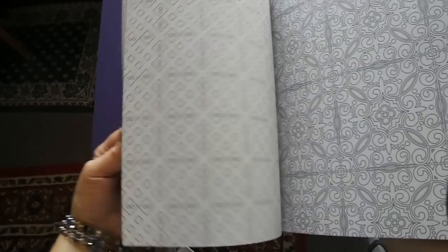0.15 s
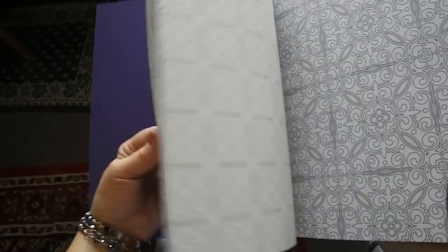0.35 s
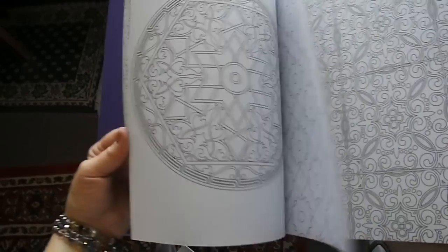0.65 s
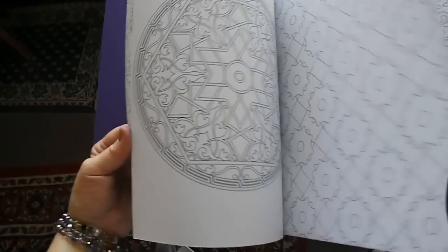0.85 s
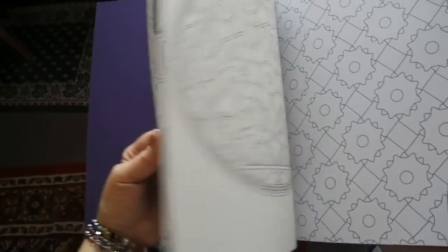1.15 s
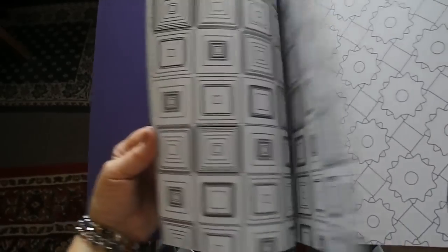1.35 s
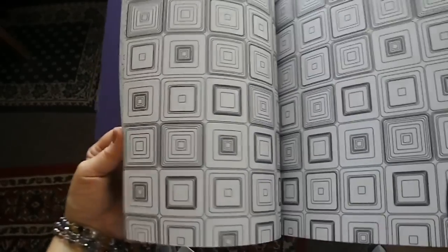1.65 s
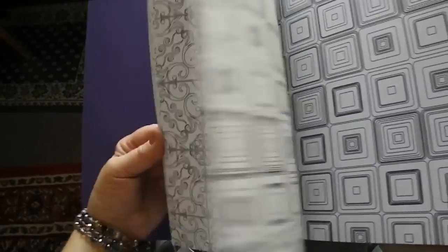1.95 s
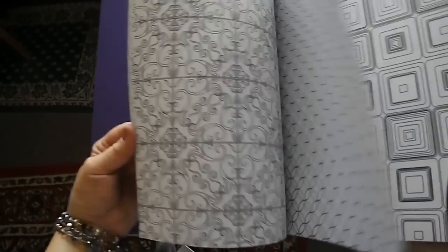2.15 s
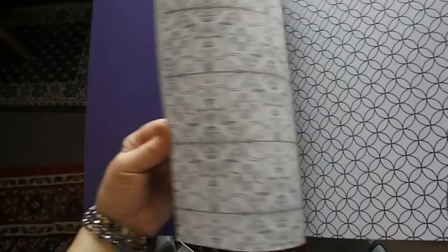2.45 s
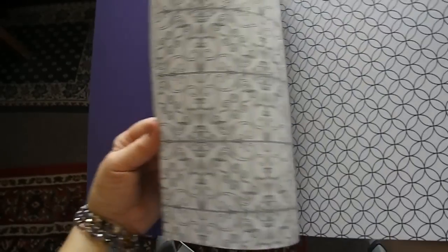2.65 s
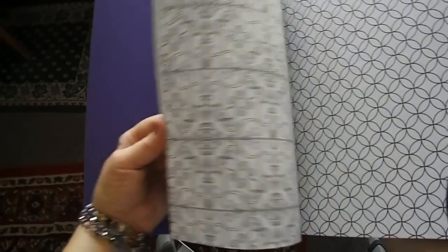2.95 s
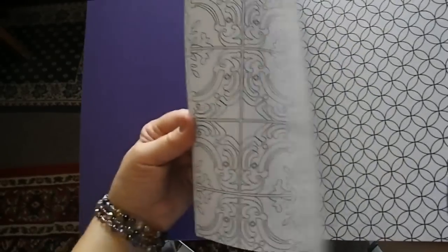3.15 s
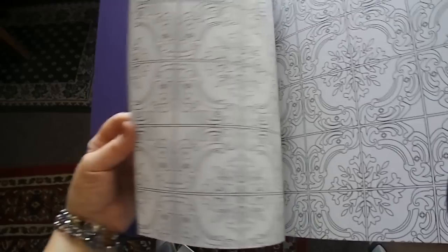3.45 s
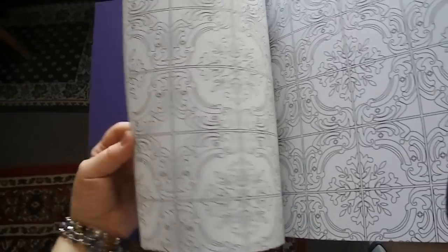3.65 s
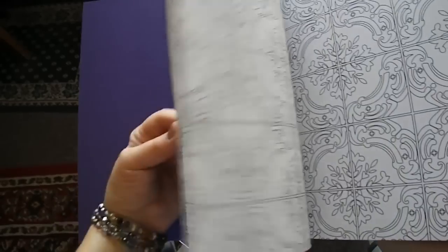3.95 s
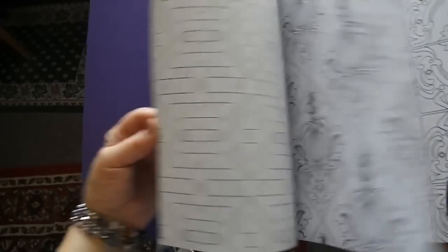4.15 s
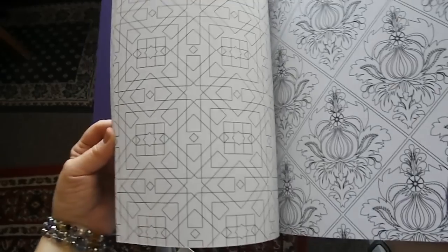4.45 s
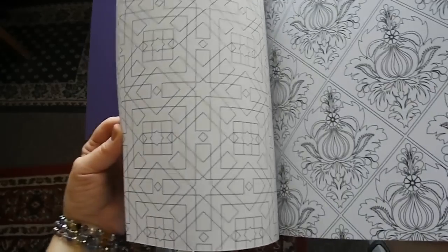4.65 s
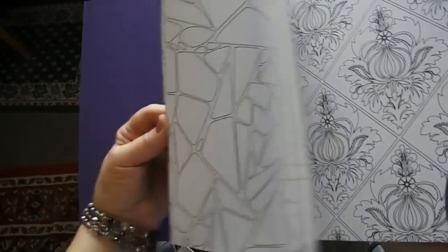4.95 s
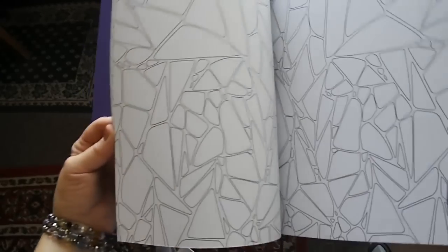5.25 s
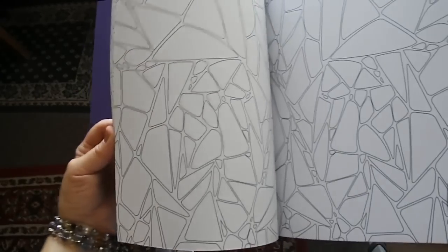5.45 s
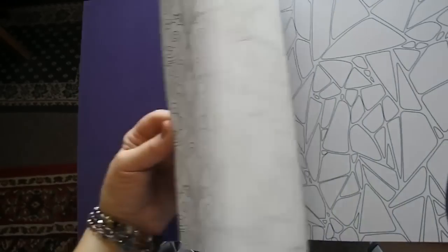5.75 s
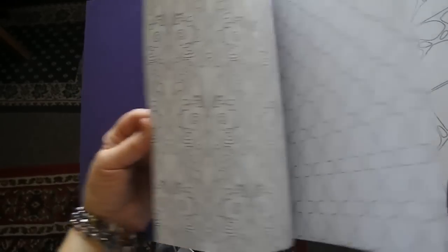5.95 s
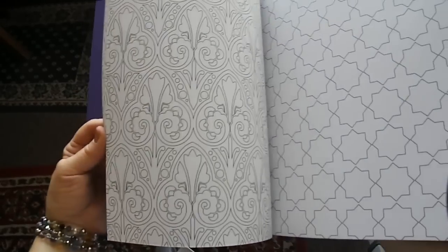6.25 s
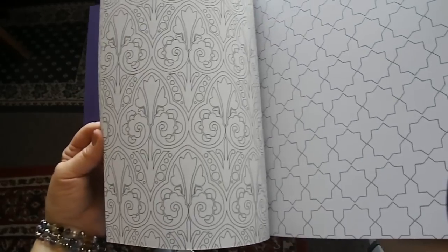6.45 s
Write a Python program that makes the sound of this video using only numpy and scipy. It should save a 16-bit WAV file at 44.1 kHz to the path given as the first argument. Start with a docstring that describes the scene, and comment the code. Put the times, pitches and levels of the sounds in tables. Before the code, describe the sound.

Thick pages of a large book slip off a thumb one after another, very close to a small camera. Each turn is a quick cluster of hollow papery snaps with bright edge ticks and a short rustle. Some flaps are loud and sharp, others only a soft slide or sweep. Between them lie restless paper movement, constant hiss, thin high whines and a faint buzz. The small room is dry.

```python
"""Stiff book pages flapping off a thumb

Stiff pages of a large book slip off a thumb one by one and flap over, close to a small camera in a quiet room.
Each flap is a cluster of buckling snaps: ringing page modes, delayed so that the highs arrive first.
Noise bursts make bright edge ticks, grains and noise a short rustle, slow band noise the sweeps and draughts.
The camera adds shaped hiss, steady whines, a buzz pulse at every frame and a comb of high tones once a second."""
import sys
import numpy as np
from scipy import signal
from scipy.fft import rfft, irfft, next_fast_len
from scipy.io import wavfile

SR = 44100
rng = np.random.default_rng(int(sys.argv[2]) if len(sys.argv) > 2 else 0)


def decibels_to_gain(level_db):
    """Convert a level in decibels to a linear amplitude gain (20 dB per decade)."""
    exponent = np.asarray(level_db, float) / 20
    return 10 ** exponent


def unload_audio(sound):
    """Save the sound as a 16-bit wav file, at the path given as the first command line argument."""
    columns = np.transpose(np.atleast_2d(sound))
    # keep every value between -1 and 1, then stretch to whole-number steps
    steps = np.round(np.clip(columns, -1, 1) * 32767)
    wavfile.write(sys.argv[1], SR, steps.astype(np.int16))


N = 290619

# hiss spectrum, relative: [freq_hz, level_db_per_hz]
HISS_SPECTRUM = [(15, -43), (30, -11), (99, -12.5), (307, -1.5), (729, -2), (1820, -3.5), (2200, -2),
                 (4100, -10.5), (4570, -4), (5090, -17), (7220, -16), (9990, -11), (11100, -10),
                 (12100, -9.5), (15800, -13.5)]
# humps in the common hiss: [centre_hz, width_hz, gain_db]
HISS_HUMPS = [(2188, 420, 7.5), (4480, 57, 2), (9040, 880, 10), (9820, 460, 13.5), (10400, 420, 9),
              (13300, 430, -3)]
# hiss that differs between left and right, against the hiss common to both: [freq_hz, rel_db]
DIFFERING_HISS_SPECTRUM = [(25, 0), (90, -10), (200, -12.5), (1500, -7), (3500, -3), (6000, 5.5),
                           (15000, -1.5)]
# narrow dips in the spectrum: [centre_hz, width_hz, gain_db]
SPECTRUM_DIPS = [(7000, 90, -16), (8420, 170, -9), (11260, 110, -11), (13680, 150, -14)]
# steady camera whines: [pitch_hz, rms_db]
WHINES = [(9778.5, -64), (11714, -62.5)]
# frame buzz harmonics 1-3: [peak_db]
BUZZ_HARMONICS_DB = [-53, -56.5, -56]
# tones of the once-a-second comb: [pitch_hz, rms_db while on]
COMB_TONES = [(10040, -62), (10567, -70.5), (11097, -61), (12150, -66)]
# moving-page air at the ports: [middle_s, length_s, level_db]
DRAUGHTS = [(.4, 0.13, -72), (.9, 0.33, -79), (1.13, 0.12, -63), (1.7, 0.53, -79), (2.22, 0.42, -77),
            (3.7, 0.17, -69), (4.93, 0.13, -76), (5.67, .1, -77)]
# pages sweeping slowly across: [middle_s, length_s, level_db]
SWEEPS = [(2.12, 0.17, -61), (2.4, 0.25, -61.5), (2.62, 0.19, -65)]
# sweep band: [low_hz, high_hz]
SWEEP_BAND_HZ = [3930, 6400]
# small hollow knocks: [start_s, level_db, pitch_hz, t60_s]
KNOCKS = [(2.721, -36, 990, 0.033), (2.724, -42.5, 633, 0.08), (2.755, -44.5, 654, 0.073),
          (2.985, -38.5, 910, 0.043), (3.257, -48, 780, 0.067)]
# paper sliding on paper or thumb: [middle_s, length_s, flutter_db, rasp_db, swish_db]
STROKES = [(0.342, .05, -77, -70, -66), (1.005, 0.062, -56.5, -54.5, -54),
           (1.158, 0.026, -33.5, -36.5, -44), (1.175, 0.041, -44, -46.5, -44),
           (1.212, 0.063, -54.5, -44.5, -52.5), (1.653, 0.11, -67, -59, -69), (2.126, 0.25, -67, -66, -71),
           (2.388, 0.16, -78, -61, -67), (2.607, 0.34, -84, -62, -67), (2.968, 0.1, -57, -56, -57),
           (3.232, 0.18, -60, -61, -68), (3.862, .07, -61, -56, -60), (4.13, .12, -78, -64, -78),
           (4.72, 0.099, -57.5, -56, -68), (4.902, 0.024, -42.5, -67, -68), (5.622, 0.031, -46.5, -55, -65),
           (5.466, .1, -63, -56, -62)]
# restless held pages: [level_db] for flutter, rasp, swish
HELD_DB = [-68.5, -67, -72.5]
# shake at a snap, against its low ring: [rel_db] for flutter, rasp, swish
SHAKE_REL_DB = [-17, -33, -36]
# shake decay: [t60_s] for flutter, rasp, swish
SHAKE_T60_S = [0.14, 0.11, .12]
# tiny-crease flutter spectrum, relative: [freq_hz, level_db_per_hz]
FLUTTER_SPECTRUM = [(71, -48), (120, -18), (535, -1.5), (802, 1.5), (1080, -5.5), (1430, -13), (1870, -10),
                    (3000, -27), (3900, -54), (6600, -120)]
# rubbing-fibre rasp spectrum, relative: [freq_hz, level_db_per_hz]
RASP_SPECTRUM = [(900, -29), (1400, 3), (2100, 0), (2700, -2.5), (3800, 0), (5200, -18.5), (6000, -45)]
# peaks favoured by the rubbed edge: [centre_hz, width_hz, gain_db]
RASP_PEAKS = [(3350, 450, 6), (4250, 450, 8)]
# sweeping-edge swish spectrum, relative: [freq_hz, level_db_per_hz]
SWISH_SPECTRUM = [(4200, -20), (5000, -0.5), (5800, -6), (6500, -3), (7200, -9), (8500, 1), (11000, -11),
                  (15500, -17)]
# page edge past thumb and paper: [start_s, body_peak_db, top_rel_db, length_ms]
TICKS = [(0.346, -51, 11, 12.0), (0.37, -29.5, -8, 6.2), (0.3948, -29.5, -9, 4.2), (0.9997, -38.5, 5.5, 5),
         (1.1085, -35, -8, 3.4), (1.1465, -33.5, 2, 7.5), (1.151, -34, 6, 13), (1.622, -50, 12, 9.8),
         (1.9157, -31, -9, 4.6), (2.178, -43, 2, 29), (2.9375, -43, 4, 2.7), (2.9476, -41, 1, 3.0),
         (2.955, -39, 4, 8), (2.9757, -42, 14, 2.2), (2.9856, -29, -2, 3.5), (2.9933, -48, 11, 3.0),
         (3.6553, -30, -6, 3.2), (3.72, -29.5, -6, 3.1), (3.841, -39, 7, 3.3), (3.8612, -43, 4, 2.8),
         (4.69, -46, 5, 4.5), (4.7004, -51.5, 21, 3.0), (4.723, -46, 4, 8.3), (4.922, -28, -8, 3.7),
         (5.44, -46, 6, 4), (5.459, -46, 7, 5.1), (5.6835, -34, 0, 3.0)]
# page modes by group, levels relative within it: [pitch_hz, level_db, t60_s at ring length factor 1]
LOW_MODES = [(338, -14.5, 0.044), (504.5, 8, 0.045), (702.5, 12, 0.023), (806, 12.5, 0.018),
             (963, -3.5, 0.043), (1128, 3, 0.03)]
MIDDLE_MODES = [(1460, -10, 0.034), (1700, 2, 0.018), (1912, 3, 0.018), (2300, -11, 0.024)]
CRACK_MODES = [(2630, 15, 0.021), (2917, 25, 0.0097), (3620, 18.5, 0.011), (4040, 8.5, 0.026),
               (5230, -45, 0.0038), (4850, -18, 0.011)]
# modes of the whole sheet pushing air: [pitch_hz, level_db, t60_s at ring length factor 1]
PUSH_MODES = [(50, -15, 0.11), (128, -3.5, 0.096), (212.5, 1, 0.28)]
# buckling snaps: [start_s, low_peak_db, middle_rel_db, crack_rel_db, ring_length_factor]
SNAPS = [(0.3632, -35.5, -12, -22, 1.3), (0.375, -14.5, -5, -14.5, 0.43), (0.3897, -20.5, -1, -11.5, 1),
         (0.403, -21.5, -6, -19, 1.5), (0.441, -22.5, -4.5, -18, 0.86), (0.4624, -36, -19, -15, 0.86),
         (0.5209, -30, -11, -28, 1.6), (1.0818, -33.5, -2, -5, 1.3), (1.093, -20.5, -6, -11, 0.6),
         (1.108, -16, 3.5, -4.5, 1.4), (1.1309, -16, 2.5, -10, 0.93), (1.1353, -30, -22, -25, 0.65),
         (1.148, -16.5, -0.5, -1, 0.85), (1.3447, -41.5, -19, -17, 1), (1.8737, -22, -3.5, -15, 1.1),
         (1.9129, -21.5, -4.5, -8, 1.24), (1.9423, -30, -18, -28, 0.71), (2.0161, -32.5, -16, -27, 1.4),
         (3.6575, -25.5, -6, -10, 1.2), (3.6666, -22, 0.5, -6.5, 0.34), (3.6689, -18, -17, -24, 1.4),
         (3.6801, -12.5, 3.5, -4, 1.07), (3.6876, -16.5, -20, -5, 0.4), (3.7055, -13.5, 4.5, -6, 0.65),
         (3.718, -21.5, -3, -2, 1.3), (3.764, -23.5, -10, -19, 1), (3.82, -30.5, -13, -27, 0.93),
         (3.8579, -29, -8, -17, 1.15), (4.9152, -21.5, -6, -22, 1.9), (4.9559, -27.5, -9.5, -14, 1.2),
         (4.9883, -27.5, -7, -26.5, 1.3), (5.0484, -33.5, -23, -28, 1.1), (5.6295, -27, -8, -13, 0.67),
         (5.6429, -17.5, 0.5, -10.5, 1.27), (5.6557, -28, -23, -18, 0.8), (5.6813, -19, -1.5, -6, 1.3),
         (5.715, -32, -13, -23, 0.85)]


def rms_one(x):
    """Scale to rms 1."""
    return x / np.sqrt(np.mean(x ** 2) + 1e-20)


def add(out, piece, start_s):
    """Mix a short sound in at start_s."""
    i = round(start_s * SR)
    out[i:i + len(piece)] += piece[:N - i]


def drift(rate_hz):
    """Smooth random wander of rms 1: white noise through a double one-pole lowpass."""
    r = np.exp(-2 * np.pi * rate_hz / SR)
    white = rng.standard_normal(N + SR)
    return rms_one(signal.lfilter([1], [1, -2 * r, r * r], white)[SR:])   # filter settles for 1 s


def shaped(x, spectrum=((1, 0), (2, 0)), bumps=(), lag_s=0):
    """Colour by a (Hz, dB) line over log frequency and bell-shaped bumps; delay by lag_s."""
    size = next_fast_len(N)
    hz = np.arange(size // 2 + 1) * SR / size + 1e-3
    line_hz, line_db = np.array(spectrum)[:, 0], np.array(spectrum)[:, 1]
    db = np.interp(np.log(hz), np.log(line_hz), line_db)
    for centre_hz, width_hz, gain_db in bumps:
        db = db + gain_db * np.exp(-(2 * (hz - centre_hz) / width_hz) ** 2)
    delay = np.exp(-2j * np.pi * hz * lag_s)
    return irfft(rfft(x, size) * decibels_to_gain(db) * delay, size)[..., :N]


def band_noise(edges_hz, channels):
    """Noise in one band, rms 1."""
    sos = signal.butter(2, edges_hz, "band", fs=SR, output="sos")
    return rms_one(signal.sosfilt(sos, rng.standard_normal((channels, N))))


def arches(rows):
    """Summed power of smooth swells (middle_s, length_s, level_db, ..): one output row per level column."""
    t = np.arange(N) / SR
    power = 0
    for middle_s, length_s, *levels_db in rows:
        swell = np.cos(np.pi * np.clip((t - middle_s) / length_s, -.5, .5)) ** 2
        power = power + decibels_to_gain(levels_db)[:, None] ** 2 * swell
    return power


def hiss():
    """Stereo noise: a humped, slightly wavering part common to both sides plus a part that differs."""
    white = rng.standard_normal((3, N))
    common = shaped(white[0] * decibels_to_gain(1.64 * drift(25)), bumps=HISS_HUMPS)
    differing = shaped(white[1:], DIFFERING_HISS_SPECTRUM)
    return decibels_to_gain(-53.5) * rms_one(shaped(common + differing, HISS_SPECTRUM))


def whines():
    """Steady sines, wavering slightly in level and phase."""
    t = np.arange(N) / SR
    out = np.zeros(N)
    for pitch_hz, rms_db in WHINES:
        level = np.sqrt(2) * decibels_to_gain(rms_db + 1.2 * drift(25))
        out += level * np.sin(2 * np.pi * pitch_hz * t + .25 * drift(40))
    return out


def frame_buzz():
    """Harmonic tone in a bell-shaped pulse around each frame time, its phase realigned every frame."""
    frame_hz, first_s, pitch_hz, half_width_s = 30.018, .0259, 4518, .005   # half width to 1/e
    t = np.arange(N) / SR
    from_frame_s = ((t - first_s) * frame_hz + .5) % 1 / frame_hz - .5 / frame_hz
    phase = 2 * np.pi * pitch_hz * from_frame_s + 0.71 * drift(100)
    gate = np.exp(-(from_frame_s / half_width_s) ** 2) * decibels_to_gain(1.3 * drift(15))
    out = np.zeros(N)
    for k, peak_db in enumerate(BUZZ_HARMONICS_DB):
        out += gate * decibels_to_gain(peak_db) * np.sin((k + 1) * phase)
    return out


def comb():
    """High unsteady tones gated on together once a second."""
    first_s, every_s, lengths_s, ramp_s = .32, 1.0, [.27, .14, .27], 0.0089   # lengths repeat in turn
    t = np.arange(N) / SR
    turn, into_s = np.divmod(t - first_s, every_s)
    length_s = np.take(lengths_s, turn.astype(int), mode="wrap") * (turn >= 0)
    gate = np.clip(np.minimum(into_s, length_s - into_s) / ramp_s, 0, 1)
    out = np.zeros(N)
    for pitch_hz, rms_db in COMB_TONES:
        level = np.sqrt(2) * decibels_to_gain(rms_db + 3 * drift(40))
        out += gate * level * np.sin(2 * np.pi * pitch_hz * t + .8 * drift(60))
    return out


def room(x):
    """Dull decaying noise tail, partly different on each side."""
    t60_s, lowpass_hz, gap_s = 0.06, 1800, .006
    t = np.arange(SR // 2) / SR
    noise = rng.standard_normal((2, len(t))) * decibels_to_gain(-60 * t / t60_s) * (t > gap_s)
    noise = signal.sosfilt(signal.butter(1, lowpass_hz, fs=SR, output="sos"), noise)
    tail = noise[0] + 0.87 * noise[1] * np.array([[1], [-1]])
    tail = tail / np.sqrt(np.sum(tail[0] ** 2))
    return decibels_to_gain(-27.0) * signal.fftconvolve(x[None], tail, axes=1)[:, :N]


def draughts():
    """Low lumpy air on the two ports, partly shared."""
    own = 0.45   # power share that each port has to itself
    air = band_noise([35, 95], channels=3)
    return np.sqrt(arches(DRAUGHTS)) * (np.sqrt(1 - own) * air[0] + np.sqrt(own) * air[1:])


def sweeps():
    """Soft band-limited hush of a page in the air."""
    return (np.sqrt(arches(SWEEPS)) * band_noise(SWEEP_BAND_HZ, channels=1))[0]


def knocks():
    """Soft taps: one decaying mode each, with a 1.4 ms rise."""
    out, t = np.zeros(N), np.arange(4096) / SR
    for start_s, level_db, pitch_hz, t60_s in KNOCKS:
        envelope = decibels_to_gain(level_db - 60 * t / t60_s) * (1 - np.exp(-t / 0.0014))
        add(out, envelope * np.sin(2 * np.pi * pitch_hz * t), start_s)
    return out


def grains(per_s, size_db):
    """Random clicks of uneven size and either sign."""
    sizes = decibels_to_gain(size_db * np.minimum(rng.exponential(1, N), 4)) * rng.choice([-1, 1], N)
    return sizes * (rng.random(N) < per_s / SR)


def motion():
    """Flutter, rasp and swish levels: held pages never quite still, strain before and shake after snaps, strokes."""
    waver_db, strain_s = 2.0, .003
    wander = np.array([drift(2.45) for _ in HELD_DB])
    power = decibels_to_gain(np.array(HELD_DB)[:, None] + waver_db * wander) ** 2
    near_s = np.arange(-SR // 20, SR // 4) / SR
    fall_db = 60 * np.maximum(near_s, 0) / np.array(SHAKE_T60_S)[:, None]
    shake = decibels_to_gain(np.array(SHAKE_REL_DB)[:, None] - fall_db)
    shake = shake * np.exp(np.minimum(near_s, 0) / strain_s)
    for start_s, low_peak_db, *_ in SNAPS:
        for row, shape in zip(power, shake):
            add(row, (decibels_to_gain(low_peak_db) * shape) ** 2, start_s + near_s[0])
    return np.sqrt(power + arches(STROKES))


def rustle():
    """Tiny creases give the low flutter, rubbing fibres the rasp, the sweeping edge an airy swish."""
    flutter = shaped(grains(820, size_db=3.0), FLUTTER_SPECTRUM)
    fibres = grains(12000, size_db=2.0) * decibels_to_gain(1.5 * drift(80))
    rasp = shaped(fibres, RASP_SPECTRUM, RASP_PEAKS)
    swish = shaped(rng.standard_normal(N) * decibels_to_gain(4.4 * drift(54)), SWISH_SPECTRUM)
    layers = (flutter, rasp, swish)
    return sum(level * rms_one(layer) for level, layer in zip(motion(), layers))


def ticks():
    """The edge catches and lets go: short dying noise bursts in a body and a top band."""
    out, t = np.zeros(N), np.arange(2048) / SR
    body = signal.butter(3, [3300, 5500], "band", fs=SR, output="sos")
    top = signal.butter(2, [8200, 13500], "band", fs=SR, output="sos")
    for start_s, body_db, top_rel_db, length_ms in TICKS:
        envelope = np.exp(-t * 1000 / (0.37 * length_ms)) * (1 - np.exp(-t / 0.00024))
        bursts = rng.standard_normal((2, len(t))) * envelope
        for sos, burst, peak_db in ((body, bursts[0], body_db), (top, bursts[1], body_db + top_rel_db)):
            piece = signal.sosfilt(sos, burst)
            add(out, decibels_to_gain(peak_db) * piece / np.abs(piece).max(), start_s)
    return out


def struck(modes, ring_length_factor):
    """Modes ring with new strengths at each snap; bending waves travel as root of pitch, so lows lag. Peak 1."""
    spread_s = 0.003448   # lag of a 500 Hz bending wave behind the highest pitches
    t = np.arange(4096) / SR
    pitch_hz, level_db, t60_s = np.transpose(modes)[:, :, None]
    chance = rng.standard_normal((2, len(modes), 1))
    level_db = level_db + 2.0 * chance[0]
    pitch_hz = pitch_hz * (1 + .015 * chance[1])
    decay = decibels_to_gain(level_db - 60 * t / (t60_s * ring_length_factor))
    rings = (decay * np.sin(2 * np.pi * pitch_hz * t)).sum(axis=0)
    # the direct wave outweighs the ringing
    front = 1 + 3.16 * np.exp(-t / (0.06 * t60_s.mean()))
    # the crease runs open over a cycle or two
    front = front * (1 - np.exp(-t * pitch_hz.mean() / 1.2))
    f = np.arange(len(t) // 2 + 1) * SR / len(t) + 1e-3
    # a crease of finite width radiates neither far below nor far above its modes
    highpass = 1 / (1 + (0.87 * pitch_hz.min() / f) ** 4)
    lowpass = 1 / (1 + (f / (1.196 * pitch_hz.max())) ** 10)
    # delay = spread * sqrt(500 Hz / f), integrated to a phase
    travel = np.exp(-4j * np.pi * spread_s * np.sqrt(500 * f))
    out = irfft(rfft(front * rings) * highpass * lowpass * travel)
    return out / np.abs(out).max()


def snaps():
    """Every buckle strikes the low, middle and crack modes; the whole sheet pushes air, growing faster."""
    push_db, push_growth = -17, 2.04   # push level at a full-scale low ring; push dB per ring dB
    out = np.zeros(N)
    for start_s, low_db, middle_rel_db, crack_rel_db, ring_length_factor in SNAPS:
        groups = ((LOW_MODES, low_db),
                  (MIDDLE_MODES, low_db + middle_rel_db),
                  (CRACK_MODES, low_db + crack_rel_db),
                  (PUSH_MODES, push_db + push_growth * low_db))
        for modes, peak_db in groups:
            add(out, decibels_to_gain(peak_db) * struck(modes, ring_length_factor), start_s)
    return out


def scene():
    """Book with its room tail, draughts on the ports, and camera noises."""
    book = snaps() + knocks() + ticks() + rustle() + sweeps()
    camera = whines() + frame_buzz() + comb()
    return book + room(book) + draughts() + camera + hiss()


def band_limit(x):
    """A steep low-pass at the top of the band."""
    return signal.sosfilt(signal.butter(12, 15970, fs=SR, output="sos"), x)


def record(dry):
    """The left side lags by a moment; both sides have narrow dips in the spectrum."""
    left = shaped(dry[0], bumps=SPECTRUM_DIPS, lag_s=2.15e-5)
    right = shaped(dry[1], bumps=SPECTRUM_DIPS)
    return band_limit(np.array([left, right]))


dry = scene()
out = record(dry)
unload_audio(out)
```